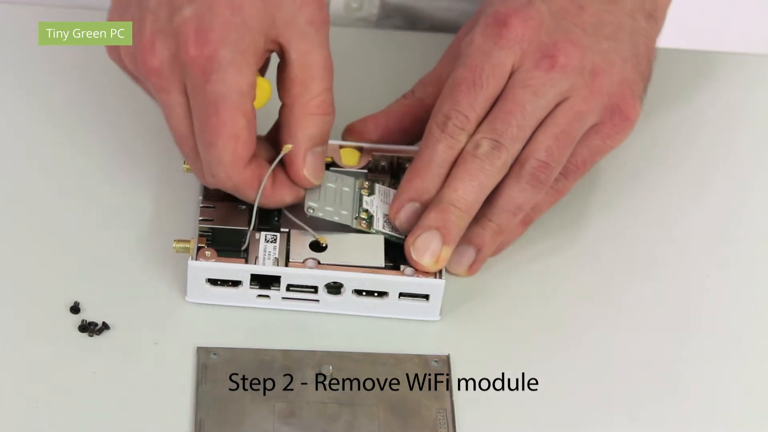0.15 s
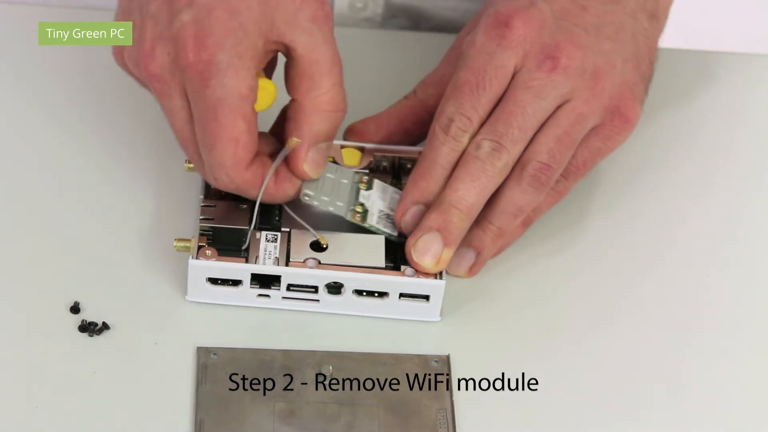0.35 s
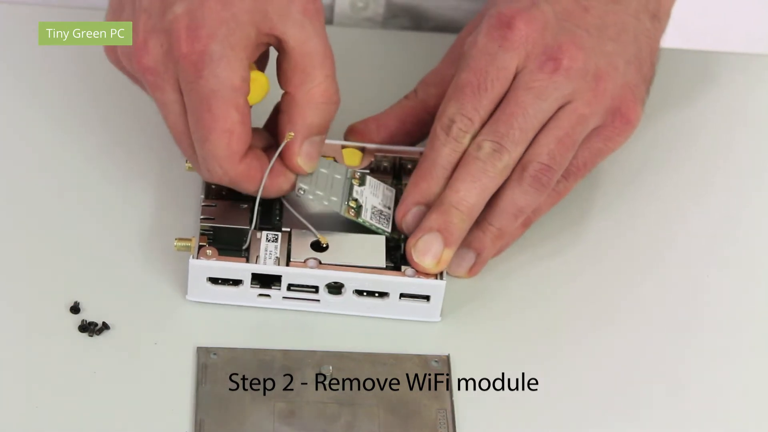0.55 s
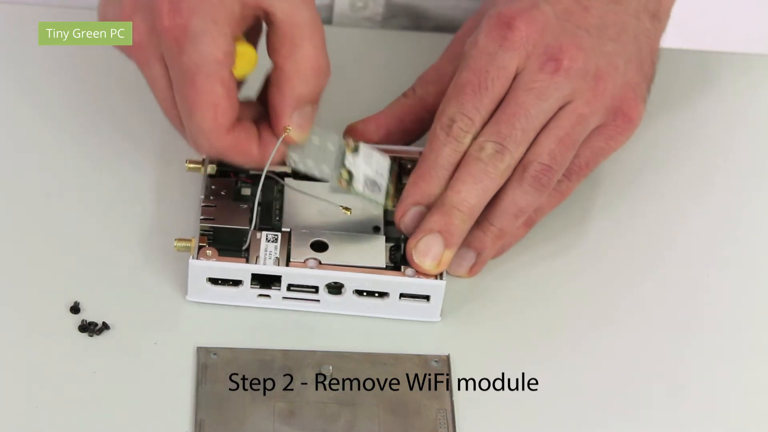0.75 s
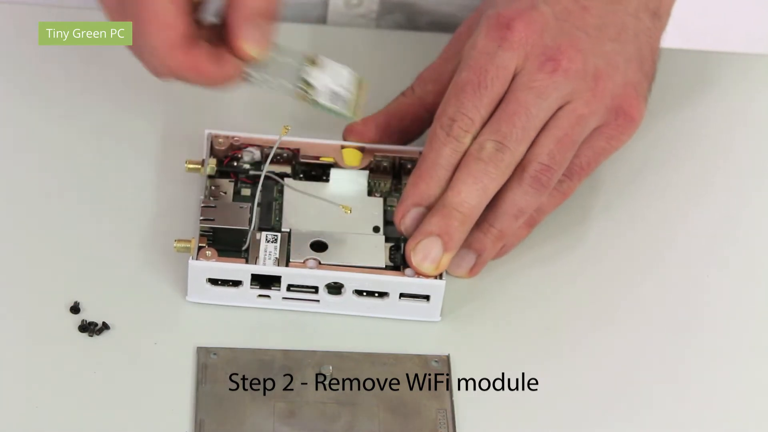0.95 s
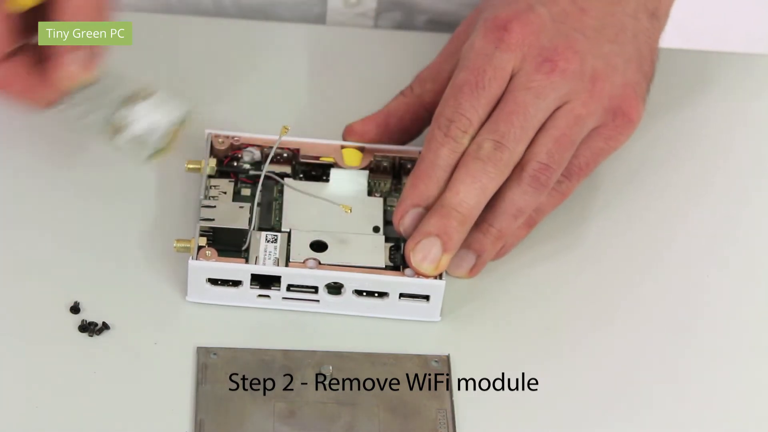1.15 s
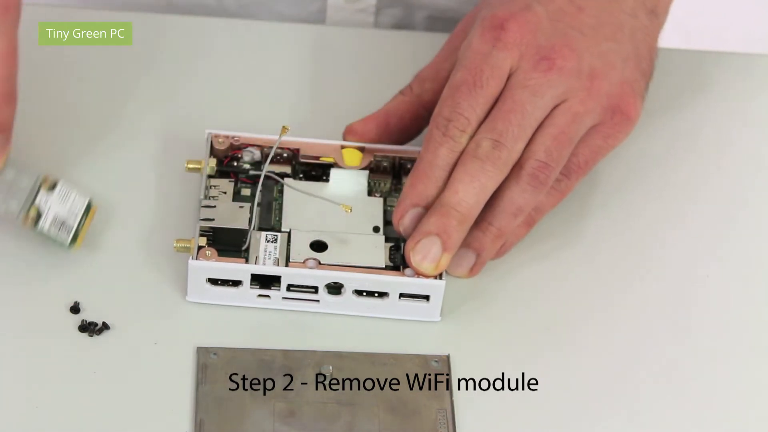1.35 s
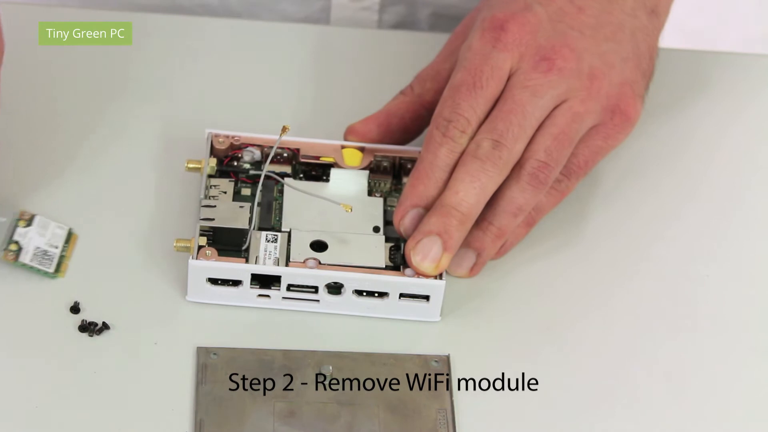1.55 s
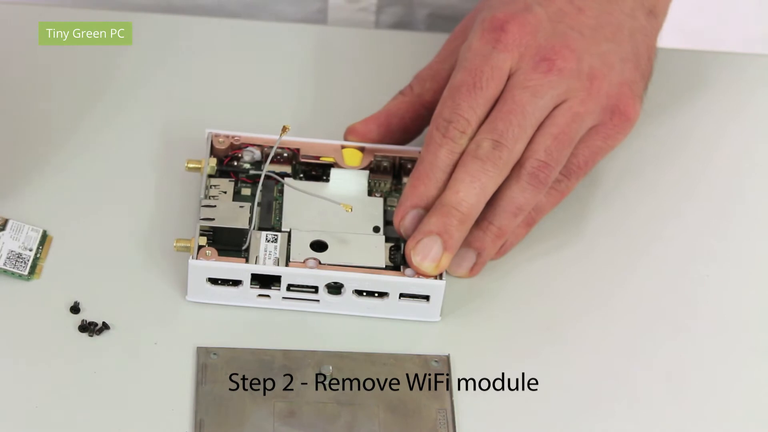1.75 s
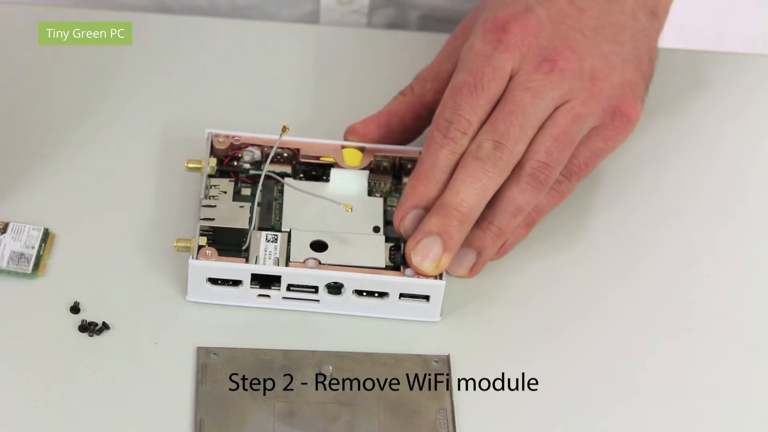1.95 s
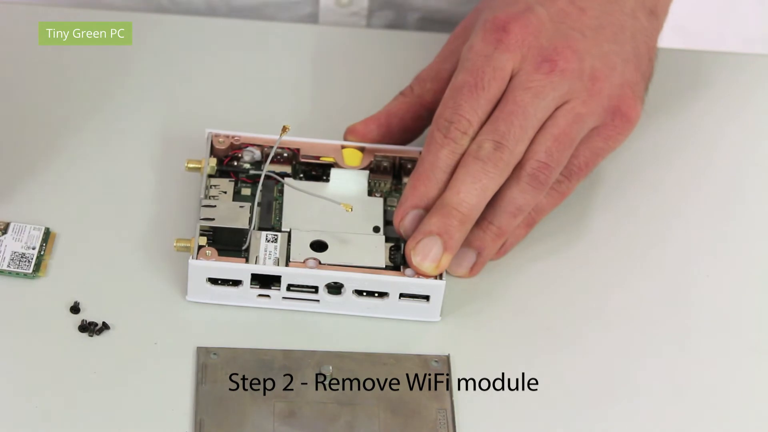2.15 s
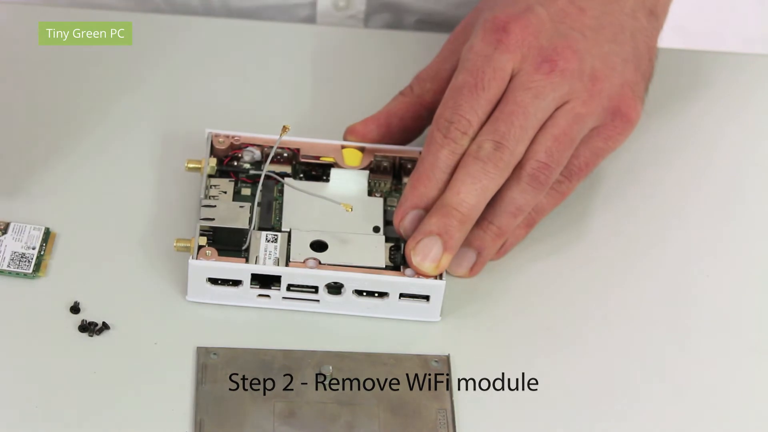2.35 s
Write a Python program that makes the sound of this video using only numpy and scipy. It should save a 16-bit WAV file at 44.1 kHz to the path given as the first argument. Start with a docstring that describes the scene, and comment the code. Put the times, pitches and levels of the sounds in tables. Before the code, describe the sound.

A small screwdriver clatters brightly onto a desk after faint clicks and scrapes of a circuit card

```python
"""Circuit card and screwdriver on a desk

A small circuit card is brushed, rocked, snapped out of its slot, set on a desk and slid aside.
A screwdriver then clatters down, rings and ticks to rest. Hits are noise bursts and decaying modes;
sliding is a train of random slips through the same bodies. A slightly live room answers them,
over the low rumble of ventilation, made of coloured noise.
"""
import sys
import numpy as np
from scipy import signal
from scipy.fft import rfft, irfft
from scipy.io import wavfile
from scipy.ndimage import uniform_filter1d

SR = 44100
rng = np.random.default_rng(int(sys.argv[2]) if len(sys.argv) > 2 else 0)


def transcribe(signal):
    """Save signal, clipped to [-1, 1], as a 16-bit WAV file at the path in sys.argv[1]."""
    frames = np.atleast_2d(signal).T
    limited = np.clip(frames, -1, 1)
    pcm = np.round(limited * 32767).astype(np.int16)
    wavfile.write(sys.argv[1], SR, pcm)


N = 110250  # samples, 2.5 s
RING_T = np.arange(SR // 3) / SR  # time axis of one hit [s]
STRIKE_SPREAD_DB = 2  # random spread of mode levels from hit to hit


# Screwdriver bounces; each point of contact favours other modes: (time [s], knock level [dB],
# low ring level [dB], middle ring level [dB], top ring level [dB], shaft note level [dB])
BOUNCES = [(1.902, -50, -41, -46, -47, -46), (1.9093, -27, -42, -40, -39, -33),
           (1.9117, -25, -55, -48, -43, -52), (1.9134, -33.5, -58, -50, -50, -58),
           (1.9184, -32.5, -26.5, -22.5, -17, -50), (1.9269, -43, -22.5, -40, -40, -58),
           (1.9334, -31, -45, -36, -44, -60), (1.9493, -24.5, -28, -25, -28, -28),
           (1.9527, -27, -44, -33, -33, -35), (1.960, -29, -35, -40, -37, -43),
           (1.974, -36, -34, -28, -25, -32.5), (1.9762, -35.5, -26.5, -32, -33, -30),
           (1.986, -33.5, -33, -57, -46, -33), (1.9964, -36, -47, -40, -29, -54),
           (2.0017, -38, -50, -43, -29, -62), (2.0185, -40, -48, -44, -35, -55),
           (2.025, -39.5, -23.5, -31.5, -30, -58), (2.0379, -34.5, -37, -34, -33, -59),
           (2.0545, -47, -44, -37.5, -47, -66), (2.064, -49, -43.5, -49, -45, -66),
           (2.148, -62, -51, -43, -55, -62), (2.2324, -60, -50, -47.5, -55, -43)]
# Dry ticks of the rocking handle: (time [s], level [dB])
HANDLE_TICKS = [(1.9070, -33), (2.1380, -42.5), (2.1516, -46), (2.164, -44), (2.1750, -47), (2.182, -49),
                (2.1960, -48.5), (2.2079, -49)]
# Colour of a tick: (frequency [Hz], level per Hz [dB])
TICK_COLOUR = [(500, -30), (4500, -8), (6800, 5), (10000, -4), (16000, -4.5)]
# Colour of a hard strike of the steel tip: (frequency [Hz], level per Hz [dB])
CRACK_COLOUR = [(1000, -27), (4900, -28), (5350, 10), (5900, 8), (6700, -3), (9000, -20), (11500, -22),
                (15000, -20)]
# Modes of the thumping desk top: (frequency [Hz], level [dB], t60 [s])
THUMP_MODES = [(255, -8, 0.066), (315, -2, 0.082), (445, 2.5, 0.046), (534, -2, 0.035)]
TICK_T60 = 0.0037  # s
CRACK_S, CRACK_DB, CRACK_T60 = 1.9190, -17.5, 0.012  # time [s], level [dB], t60 [s]
THUMP_S, THUMP_DB = 1.9098, -35  # time [s], level [dB]
STEEL_RISE_S = 0.00056


def screwdriver():
    """Handle and steel hit the desk and chatter, the shaft sings, and the handle ticks."""
    knocks, chinks, swing, rattle = np.zeros((4, N))
    for s, knock_db, low_db, middle_db, top_db, shaft_db in BOUNCES:
        steel = steel_strike(low_db, middle_db, top_db)
        add(knocks, s, amp(knock_db) * handle_knock())
        add(chinks, s, np.minimum(RING_T / STEEL_RISE_S, 1) * steel)
        add(rattle, s, amp(knock_db) * chatter_swell())
        add(swing, s, amp(shaft_db) * shaft_swell(s))
    add(chinks, CRACK_S, amp(CRACK_DB) * burst(CRACK_COLOUR, CRACK_T60))
    add(knocks, THUMP_S, amp(THUMP_DB) * ring(THUMP_MODES))
    for s, db in HANDLE_TICKS:
        add(chinks, s, amp(db) * burst(TICK_COLOUR, TICK_T60))
    chinks += rattle * chatter()
    return knocks, chinks, shaft_note(swing)


# Bright ring of the steel before detuning, three families of close modes:
# (frequency [Hz], level [dB], t60 [s])
STEEL_LOW = [(6110, -7.5, 0.015), (6760, -7.5, 0.021), (7070, -6.5, 0.023), (7180, -0.5, 0.021),
             (7480, 0, 0.014)]
STEEL_MIDDLE = [(8850, -10, 0.03), (9470, -12, 0.016), (10190, -2, 0.016), (10460, -1, 0.026),
                (10860, -8, .008), (11610, -1.5, 0.015), (11300, -2, 0.014)]
STEEL_TOP = [(12760, -5, 0.02), (12900, 3, 0.03), (12970, -8, 0.014)]
STEEL_DETUNE = 0.004  # share by which contact with the desk shifts the modes
STEEL_GRIT_DB = -6  # contact noise relative to the middle ring


def steel_strike(low_db, middle_db, top_db):
    """Contact noise and three families of steel modes, each family shifted in pitch as one."""
    steel = amp(middle_db + STEEL_GRIT_DB) * grit()
    for family, level_db in (STEEL_LOW, low_db), (STEEL_MIDDLE, middle_db), (STEEL_TOP, top_db):
        shift = 1 + STEEL_DETUNE * rng.uniform(-1.1, 1)
        shifted = [(hz * shift, db, t60) for hz, db, t60 in family]
        steel = steel + amp(level_db) * ring(shifted, STRIKE_SPREAD_DB)
    return steel


# Colour of the handle's knock on the desk: (frequency [Hz], level per Hz [dB])
DESK_KNOCK = [(100, -12), (290, -5.5), (560, -7), (950, -18), (1250, -1.5), (1600, -4.5), (1920, 4.5),
              (2350, -1.5), (2750, 2), (3350, -6), (3700, -3), (4400, -5), (4900, -10), (16000, -21)]
DESK_KNOCK_T60 = 0.028  # s


def handle_knock():
    """The handle's hit excites many dense, short vibrations of the desk."""
    return burst(DESK_KNOCK, DESK_KNOCK_T60)


CHATTER_DB, CHATTER_T60 = -10.5, 0.086  # level relative to the knock [dB], t60 [s]


def chatter_swell():
    """The strength of the fine rattle jumps up at a bounce and dies away."""
    return amp(CHATTER_DB) * decay(RING_T, CHATTER_T60)


def chatter():
    """Tiny random contacts keep both steel and desk sounding."""
    return rubbed(ring(STEEL_LOW + STEEL_MIDDLE) + handle_knock())


SHAFT_HZ, SHAFT_T60, SHAFT_RISE_S = 5337, 0.14, 0.0011
SETTLE_S, SETTLE_T60 = 2.038, 0.05  # when the shaft comes to lie on the desk, and its added damping


def shaft_swell(s):
    """A bounce sets the shaft swinging; lying on the desk damps it further."""
    damping = decay(np.maximum(RING_T - max(SETTLE_S - s, 0), 0), SETTLE_T60)
    return np.minimum(RING_T / SHAFT_RISE_S, 1) * decay(RING_T, SHAFT_T60) * damping


def shaft_note(swing):
    """The shaft sings one steady pitch as strongly as it swings."""
    return swing * np.sin(2 * np.pi * SHAFT_HZ * np.arange(N) / SR)


# Card set down and shifted on the desk: (time [s], knock level [dB], edge ring level [dB])
CARD_TAPS = [(1.4326, -35.5, -41), (1.452, -51, -43.5), (1.5897, -39.5, -39), (1.678, -58, -51)]


def card_taps():
    """Each tap on the desk is a dull knock with a ring of the card's edge."""
    out = np.zeros(N)
    for s, knock_db, ring_db in CARD_TAPS:
        add(out, s, amp(knock_db) * card_knock() + amp(ring_db) * card_edge())
    return out


# Contacts snapping out of the slot: (time [s], level [dB])
SNAPS = [(0.591, -37.5), (0.6028, -48.5)]
# Colour of a snap: (frequency [Hz], level per Hz [dB])
SNAP_COLOUR = [(300, -20), (1800, -16), (2700, -1), (4200, -6), (5600, 2), (7800, -11), (9900, 4.5),
               (12000, -6), (16000, -7)]
SNAP_T60, SNAP_RING_DB = 0.012, -4  # t60 [s], edge ring relative to the snap [dB]


def card_snaps():
    """The contacts let go with a short burst that makes the card's edge ring."""
    out = np.zeros(N)
    for s, db in SNAPS:
        add(out, s, amp(db) * (burst(SNAP_COLOUR, SNAP_T60) + amp(SNAP_RING_DB) * edge_ring()))
    return out


# Card rubbing on slot and desk:
# (start [s], length [s], hiss level [dB], squeak level [dB], dull rasp level [dB])
CARD_STROKES = [(0.32, 0.027, -48, -60, -49.5), (0.349, .064, -53, -70, -59),
                (1.503, 0.23, -55, -54, -59.5), (1.530, 0.023, -51, -55, -51),
                (1.571, 0.08, -55.5, -53, -63), (1.649, 0.049, -51, -41.5, -64),
                (1.789, 0.051, -54.5, -59, -66), (1.856, 0.053, -48, -61, -59),
                (1.875, 0.036, -56, -53, -47.5)]
# Squeak of the sliding card before its glide: (frequency [Hz], level [dB], t60 [s])
SQUEAK_MODES = [(1895, -8, 0.019), (2078, -0.5, 0.043), (2247, 0, 0.043), (2890, -10, 0.016)]
# Glide of the squeak as the card slides: (time [s], pitch ratio [1])
SQUEAK_GLIDE = [(1.54, .96), (1.59, 1.02), (1.65, 1)]
RUB_GRIT_DB = -1.5  # contact noise relative to the edge ring
CATCH_S, CATCH_DB = 0.004, 1.8  # smoothing [s] and rms depth [dB] of the catching


def card_scrapes():
    """The card catches and slips, with a gritty hiss, a gliding squeak and a dull rasp."""
    hiss, squeak, rasp = np.zeros((3, N))
    for start, length, hiss_db, squeak_db, rasp_db in CARD_STROKES:
        pressure = stroke(length)
        add(hiss, start, amp(hiss_db) * pressure)
        add(squeak, start, amp(squeak_db) * pressure)
        add(rasp, start, amp(rasp_db) * pressure)
    samples = np.arange(N)
    glide = np.interp(samples / SR, *np.transpose(SQUEAK_GLIDE))
    # reading the squeak faster or slower bends its pitch
    squeal = np.interp(np.cumsum(glide), samples, rubbed(ring(SQUEAK_MODES)))
    wander = evened(uniform_filter1d(rng.standard_normal(N), round(CATCH_S * SR)))
    catching = evened(amp(CATCH_DB * wander))
    gritty = rubbed(edge_ring() + amp(RUB_GRIT_DB) * grit())
    dull = rubbed(card_knock())
    return catching * (hiss * gritty + squeak * squeal + rasp * dull)


# Colour of the card's dull knock: (frequency [Hz], level per Hz [dB])
CARD_KNOCK = [(100, -28), (900, -14), (1400, -6.5), (1950, 0.5), (2500, -7), (3200, -3), (4300, -14),
              (12000, -21.5)]
CARD_KNOCK_T60 = 0.031  # s


def card_knock():
    """The flat of the card answers a hit with dense, short vibrations."""
    return burst(CARD_KNOCK, CARD_KNOCK_T60)


# Ring of the card's edge: (frequency [Hz], level [dB], t60 [s])
CARD_MODES = [(4980, 0.5, 0.0045), (6140, -7.5, 0.014), (7200, -1.5, 0.021), (7460, -1.5, 0.013),
              (9520, -6, 0.011), (10210, -1.5, 0.011), (13060, -5.5, 0.02)]


def edge_ring(spread_db=0):
    """The stiff edge of the card rings in a few bright, short modes."""
    return ring(CARD_MODES, spread_db)


CARD_GRIT_DB = -8  # contact noise relative to the edge ring


def card_edge():
    """One gritty tap on the card's edge."""
    return edge_ring(STRIKE_SPREAD_DB) + amp(CARD_GRIT_DB) * grit()


# Card rocked in its slot: # (time [s], knock level [dB], edge ring level [dB], case note level [dB])
SLOT_KNOCKS = [(.3428, -35.5, -38, -41), (0.3816, -40, -53, -40.5), (0.3865, -50, -46, -54)]
# Colour of the card's knock in its slot: (frequency [Hz], level per Hz [dB])
SLOT_KNOCK = [(150, -22), (430, 4.5), (750, -17), (1100, -3), (1400, -21), (1750, -2), (2600, -1),
              (3250, -18.5), (3800, -7), (7000, -25)]
# Ring of the case around the slot: (frequency [Hz], level [dB], t60 [s])
CASE_MODES = [(2480, -2, 0.016), (2672, 1.5, 0.028)]
SLOT_KNOCK_T60 = 0.027  # s


def slot_knocks():
    """The card is rocked in its slot, and the case around it rings with a short, woody note."""
    out = np.zeros(N)
    for s, knock_db, ring_db, note_db in SLOT_KNOCKS:
        add(out, s, amp(knock_db) * burst(SLOT_KNOCK, SLOT_KNOCK_T60))
        add(out, s, amp(ring_db) * card_edge())
        add(out, s, amp(note_db) * ring(CASE_MODES))
    return out


# Contact noise of small hard surfaces: (frequency [Hz], level per Hz [dB])
GRIT_COLOUR = [(200, -22), (1500, -9), (6000, 0), (12000, -1), (16000, -7)]
GRIT_T60 = 0.01  # s


def grit():
    """Rough surfaces meeting give a bright, very short burst."""
    return burst(GRIT_COLOUR, GRIT_T60)


# Fingertips brushing the card as they take hold: (start [s], length [s], level [dB])
BRUSHES = [(0.094, 0.02, -50), (0.253, 0.028, -51.5), (0.56, 0.02, -56)]
# Colour of skin on the card: (frequency [Hz], level per Hz [dB])
BRUSH_COLOUR = [(1700, -16), (2700, 2), (5400, -5), (10000, -17)]


def fingertips():
    """Short, dry brushes of skin on the card, made of many small slips."""
    pressure = np.zeros(N)
    for start, length, db in BRUSHES:
        add(pressure, start, amp(db) * stroke(length))
    return pressure * rubbed(burst(BRUSH_COLOUR, GRIT_T60))


# Decay of the room: (frequency [Hz], t60 [s])
ROOM_T60 = [(200, 0.24), (1500, 0.66), (5000, 0.44), (14000, 0.32)]
# Colour of the tail: (frequency [Hz], level [dB])
ROOM_COLOUR = [(200, -2.5), (900, 2), (2000, -4), (5000, -5), (9000, -7.5), (14000, -11)]
# Early reflections: (delay [s], gain [1])
REFLECTIONS = [(.0027, 0.11), (.0098, 0.38)]
ROOM_BUILD_S = 0.0046  # time constant of the tail's build-up


def room(x):
    """A few near reflections and a diffuse tail whose decay time varies with frequency."""
    hz, t, z = signal.stft(rng.standard_normal(SR), SR, nperseg=256)
    z = z * decay(t, read(ROOM_T60, hz)[:, None]) * (1 - np.exp(-t / ROOM_BUILD_S))
    plain = signal.istft(z, SR, nperseg=256)[1]
    coloured = signal.istft(z * amp(read(ROOM_COLOUR, hz))[:, None], SR, nperseg=256)[1]
    tail = coloured / np.linalg.norm(plain)
    for delay, gain in REFLECTIONS:
        add(tail, delay, np.array([gain]))
    return signal.fftconvolve(x, tail)[:N]


# Colour of the ventilation rumble: (frequency [Hz], level per Hz [dB])
AIR_COLOUR = [(20, -66), (40, -28), (91, -16.5), (135, 2), (240, -2.5), (510, -8), (830, -13),
              (1400, -16.5), (3200, -24.5), (12700, -29), (15800, -29)]
AIR_DB = -50  # rms level


def air():
    """Ventilation gives a steady noise, strongest in the low range."""
    return amp(AIR_DB) * noise(AIR_COLOUR, N)


def amp(db):
    """Decibels to gain."""
    return 10 ** (np.asarray(db) / 20)


def read(points, hz):
    """A table's value on a log-frequency axis."""
    f, value = np.transpose(points)
    return np.interp(np.log(hz + 1), np.log(f + 1), value)


def add(mix, s, sound):
    """Mixes a sound in at a time in seconds."""
    part = mix[max(round(s * SR), 0):][:len(sound)]
    part += sound[:len(part)]


def evened(x):
    """Scales to rms 1."""
    return x / np.sqrt(np.mean(x ** 2) + 1e-20)


def blow(x):
    """Scales a hit to the energy of three milliseconds at rms 1."""
    return x * np.sqrt(.003 * SR / np.sum(x ** 2))


def decay(t, t60):
    """Falls by 60 dB in t60."""
    return np.exp(-np.log(1000) * t / t60)


def noise(spectrum, size):
    """Random-phase noise of a given colour."""
    hz = np.fft.rfftfreq(size, 1 / SR)
    phase = np.exp(2j * np.pi * rng.random(len(hz)))
    return evened(irfft(amp(read(spectrum, hz)) * phase, size))


RIPPLE = 0.26  # how far a burst strays from its colour, 0-1


def burst(spectrum, t60):
    """Many dense, quickly dying vibrations with a given overall colour."""
    size = 4096
    z = rfft(rng.standard_normal(size) * decay(RING_T[:size], t60))
    flattened = z / (abs(z) + 1e-9) ** (1 - np.clip(RIPPLE, 0, 1))
    coloured = irfft(flattened * amp(read(spectrum, np.fft.rfftfreq(size, 1 / SR))))
    return blow(np.pad(coloured[:size // 2], (0, len(RING_T) - size // 2)))


def ring(modes, spread_db=0):
    """Struck modes, neighbours swinging in opposite directions; the spread varies their mix."""
    louder = spread_db * rng.standard_normal(len(modes))
    out = np.zeros(len(RING_T))
    for k, (hz, db, t60) in enumerate(modes):
        swing = decay(RING_T, t60) * np.sin(2 * np.pi * hz * RING_T)
        out += (-1) ** k * amp(db + louder[k]) * swing
    return blow(out)


SLIPS_PER_S, SLIP_SPREAD_DB = 2500, 4.5  # mean rate, scale of the random slip levels


def rubbed(body):
    """Dense, uneven slips keep a body ringing."""
    happens = rng.random(N) < SLIPS_PER_S / SR
    sign = rng.choice([-1, 1], N)
    strength = amp(SLIP_SPREAD_DB * np.minimum(rng.exponential(1, N), 4))
    return evened(signal.fftconvolve(happens * sign * strength, body)[:N])


STROKE_EDGE_S = 0.013  # a shorter stroke peaks below full pressure


def stroke(length):
    """The pressure of one stroke swells and fades, with a hold if it is long enough."""
    t = np.arange(0, length, 1 / SR)
    return np.minimum(np.minimum(t, length - t) / STROKE_EDGE_S, 1)


# Levels sent to the room [dB]; the hands and the case shield the slot
KNOCK_ROOM_DB, STEEL_ROOM_DB, SHAFT_ROOM_DB = -1.5, -3, -9.5
CARD_ROOM_DB, SLOT_ROOM_DB = -5, -10.5
LOW_CUT_HZ = 154


def scene():
    """Card and screwdriver, too small to radiate bass, in the room over its steady air noise."""
    knocks, chinks, shaft = screwdriver()
    card = card_taps() + card_snaps() + card_scrapes() + fingertips()
    slot = slot_knocks()
    tool_send = amp(KNOCK_ROOM_DB) * knocks + amp(STEEL_ROOM_DB) * chinks + amp(SHAFT_ROOM_DB) * shaft
    card_send = amp(CARD_ROOM_DB) * card + amp(SLOT_ROOM_DB) * slot
    handling = knocks + chinks + shaft + card + slot + room(tool_send + card_send)
    low_cut = signal.butter(4, LOW_CUT_HZ, "high", fs=SR, output="sos")
    return (signal.sosfilt(low_cut, handling) + air())[None]


EDGE_HZ = 15800


def record(dry):
    """The recorder's band limit, a steep low-pass."""
    low_pass = signal.firwin(511, EDGE_HZ, window=("kaiser", 9), fs=SR)
    return signal.oaconvolve(dry, low_pass[None], "same")


dry = scene()
out = record(dry)
transcribe(out)
```